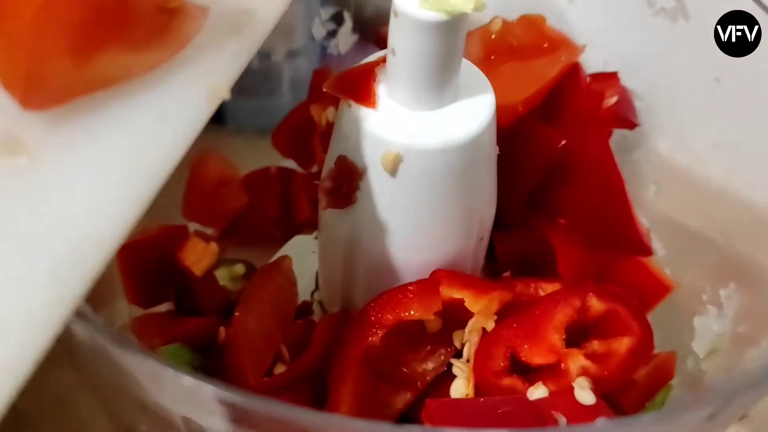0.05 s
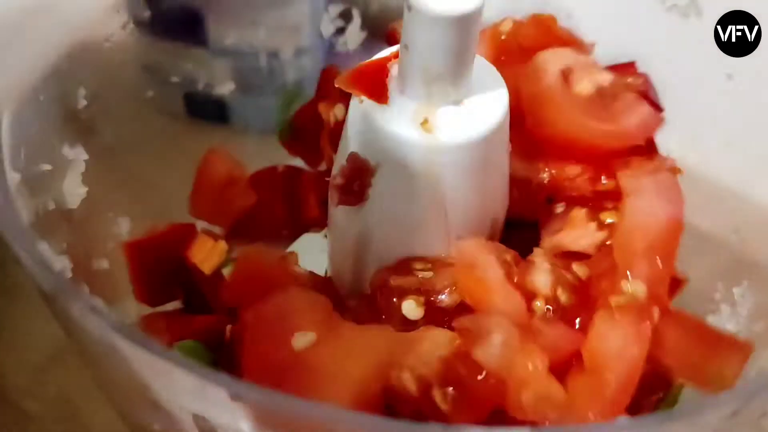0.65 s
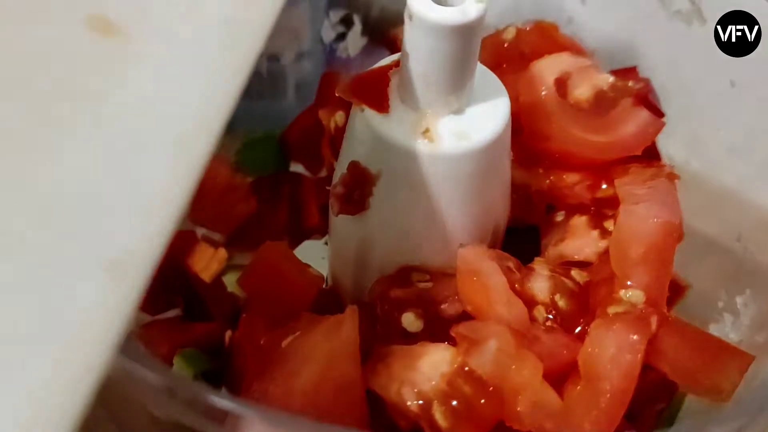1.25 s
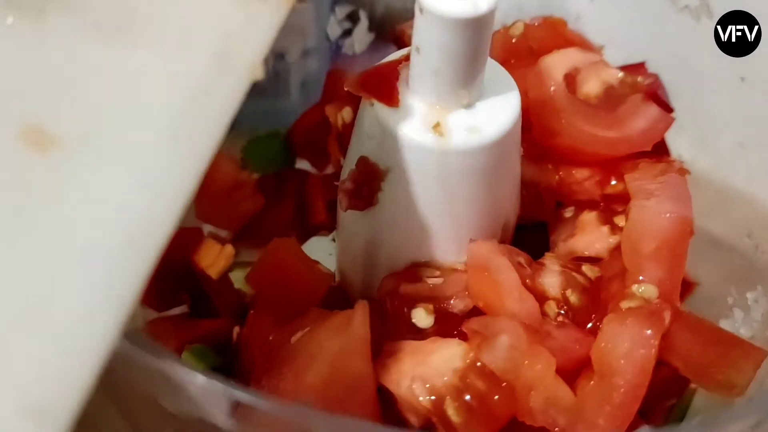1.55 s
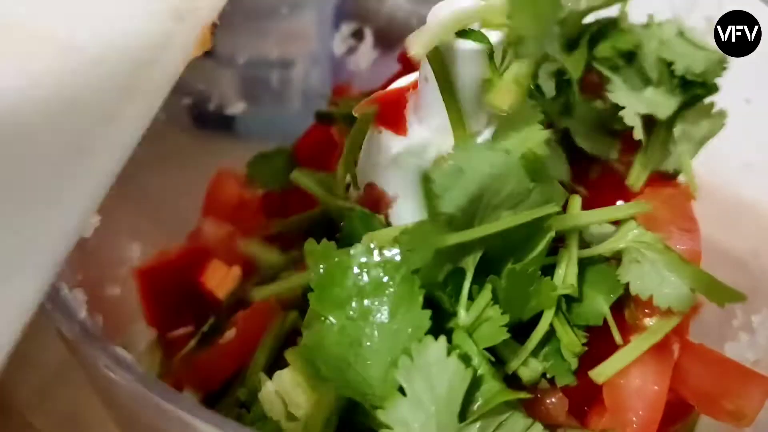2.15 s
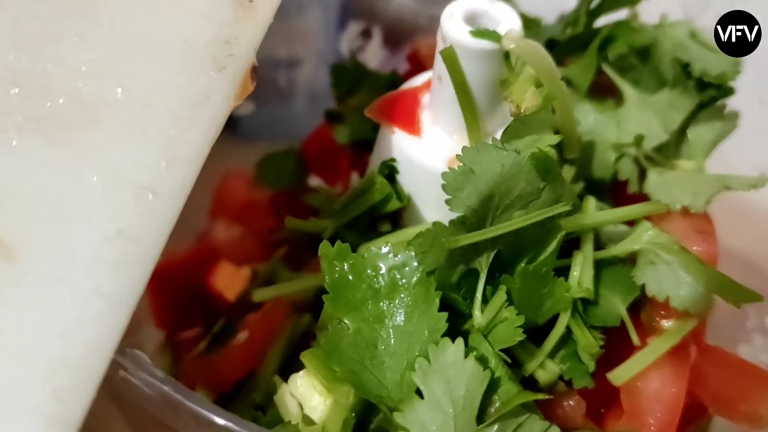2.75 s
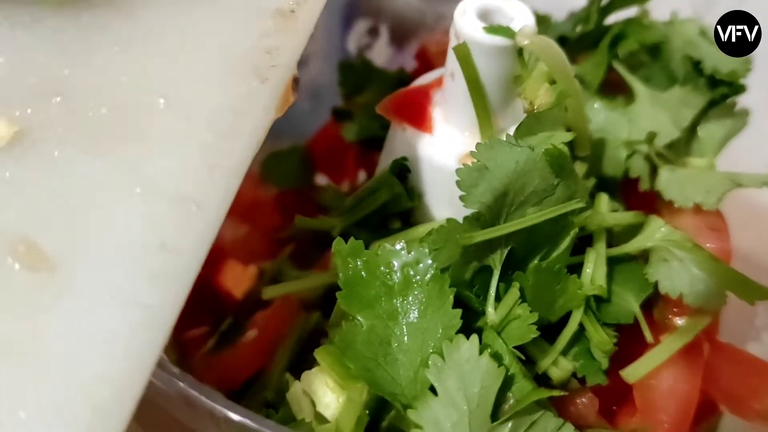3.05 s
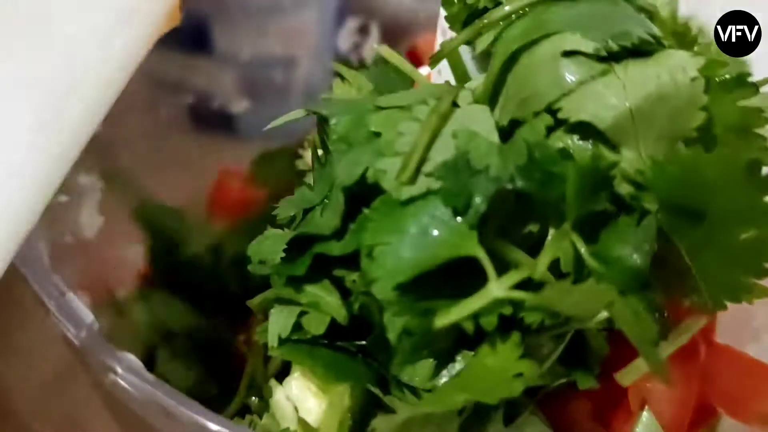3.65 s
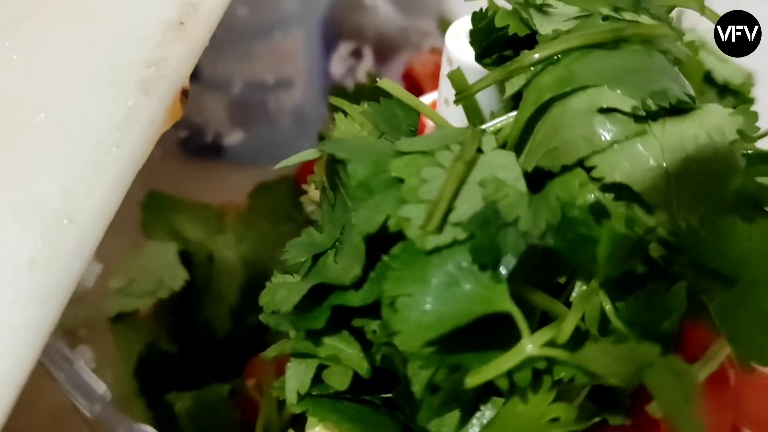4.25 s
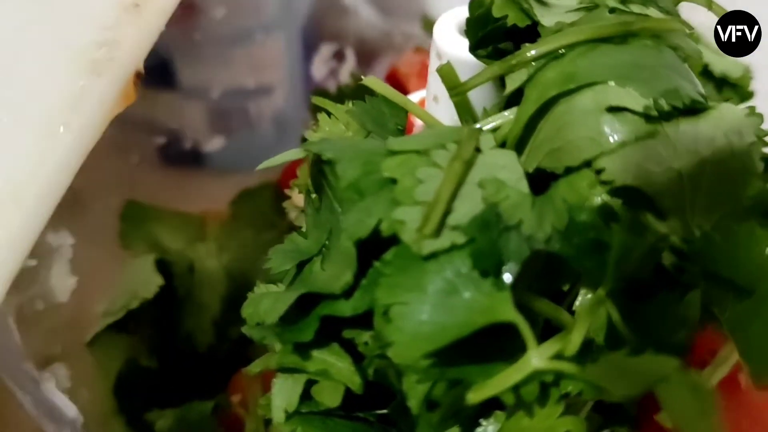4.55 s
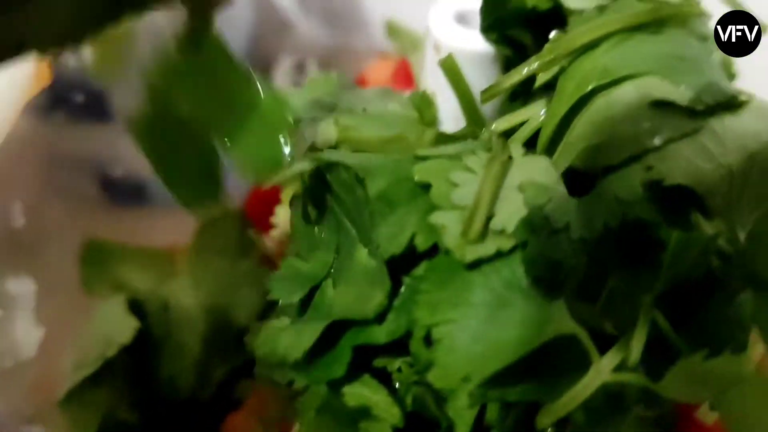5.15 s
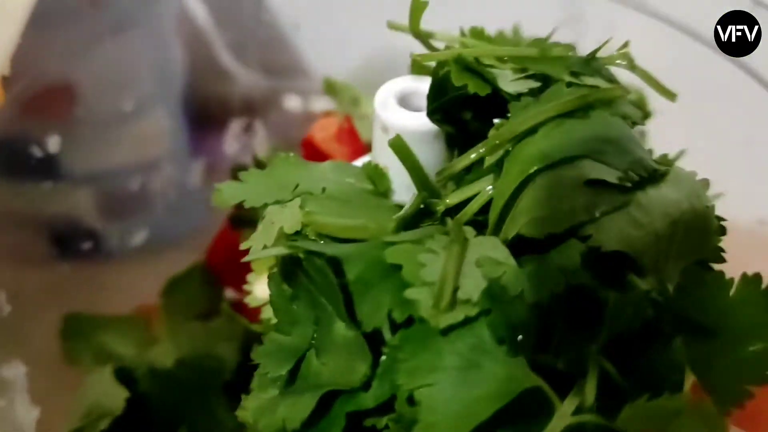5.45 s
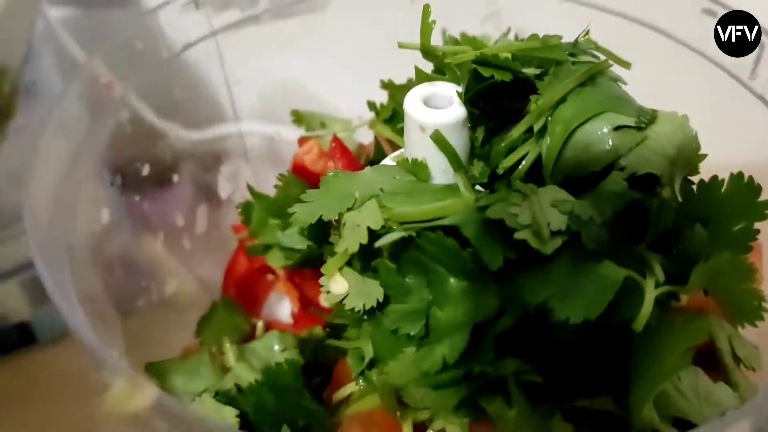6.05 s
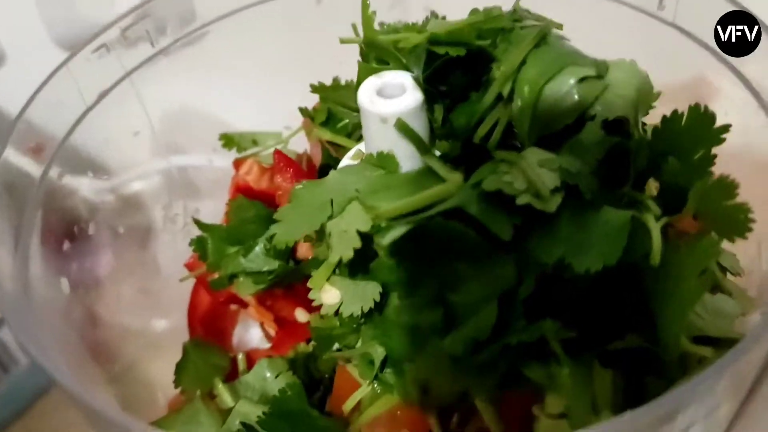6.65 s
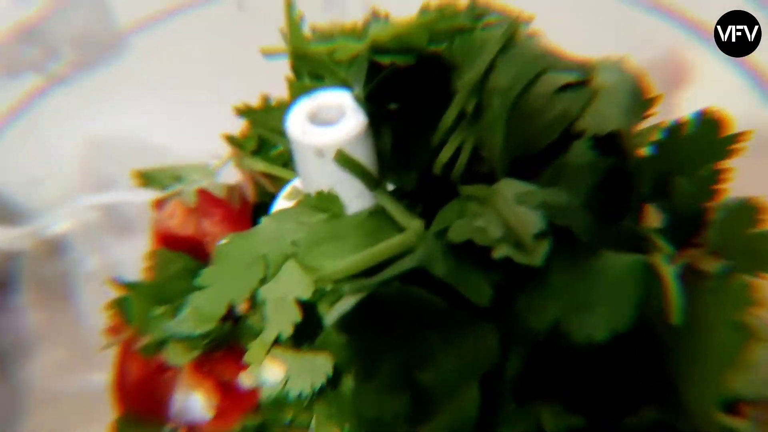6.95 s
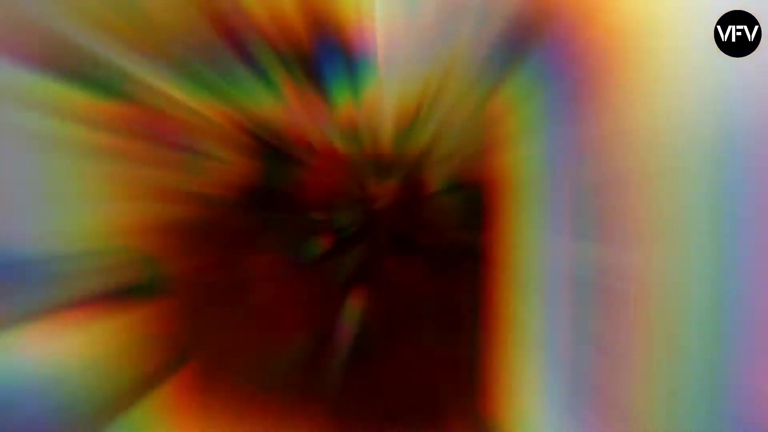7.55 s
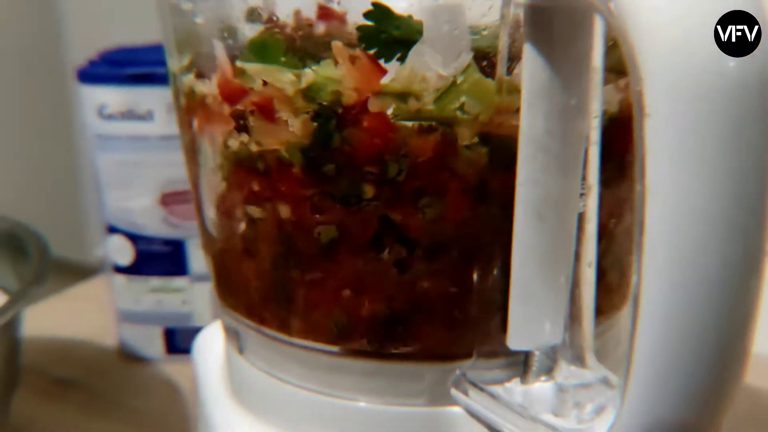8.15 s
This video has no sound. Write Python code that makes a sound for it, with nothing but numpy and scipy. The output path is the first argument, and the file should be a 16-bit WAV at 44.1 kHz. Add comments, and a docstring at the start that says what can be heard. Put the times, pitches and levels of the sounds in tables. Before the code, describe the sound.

Close to the microphone in a quiet kitchen, a knife briefly scrapes and taps a plastic cutting board. A sharp knock comes at about 0.9 seconds, then wet chopped vegetables slide, squelch and tumble softly into a plastic bowl until around 2 seconds. Another sharp knock at 2.4 seconds leads into two short scrapes, followed by leafy rustling, soft bumps and small wet ticks. From 3.7 to 5.4 seconds the knife makes louder, hissing, rasping strokes mixed with taps, and a quick run of knocks follows between 5.2 and 5.9 seconds. Around 6.5 seconds the plastic bowl gives a cluster of clicks and hollow clunks. After one more click at 7.1 seconds, a food chopper starts and swells, churning with a wet whirr as pieces slap and drum against the wall, still running at the end, about 8.3 seconds.

```python
"""A knife knocks and scrapes chopped vegetables off a plastic board into a food chopper, close by
in a kitchen. Wet pieces rustle and tumble, the plastic bowl clunks, then the chopper starts and churns.
The edge sticks and slips on the flexing board; blows ring the modes of board and bowl; the chopper's
blades fling pieces at the wall, which drums bowl and housing."""
import sys
import numpy as np
from scipy import signal
from scipy.fft import irfft
from scipy.io import wavfile
from scipy.ndimage import uniform_filter1d, map_coordinates

SR = 44100
rng = np.random.default_rng(int(sys.argv[2]) if len(sys.argv) > 2 else 0)


def wav_out(sig):
    """Save sig, one row per channel (or a flat mono array), as 16-bit PCM at SR to the path in sys.argv[1]."""
    wavfile.write(sys.argv[1], SR, np.round(np.clip(np.atleast_2d(sig).T, -1, 1) * 32767).astype(np.int16))


N = 365588
TIME = np.arange(N) / SR
RING_S = np.arange(SR * 2 // 3) / SR  # time axis of a decay
CHOPPER_START_S = 7.16
# board to the right, then the microphones turn to the bowl: t/s, left lag/ms, left minus right/dB
BEARING = [(0, 0.4, -4), (3.8, 0.39, -2), (5.3, 0.4, -1.5), (5.8, 0.4, -4), (6.2, 0.239, 0.5),
           (6.6, .2, 2.5), (8.3, .27, -0.5)]


def amp(db):
    """Decibels to gain."""
    return 10 ** (np.asarray(db) / 20)


def unit(x):
    """Scale to rms 1."""
    return x / np.sqrt(np.mean(x ** 2) + 1e-20)


def at_hz(points, hz):
    """Interpolate a table over log frequency."""
    f, value = np.transpose(points)
    return np.interp(np.log(hz + 1), np.log(f + 1), value)


def over_time(rows, column):
    """Interpolate one table column over time."""
    return np.interp(TIME, *np.transpose(rows)[[0, column]])


def add(mix, start_s, sound):
    """Mix in a sound at start_s."""
    part = mix[max(round(start_s * SR), 0):][:len(sound)]
    part += sound[:len(part)]


def colour(x, spectrum, size=2048):
    """Minimum-phase filter; spectrum: f/Hz, gain/dB."""
    log_gain = np.log(amp(at_hz(spectrum, abs(np.fft.fftfreq(size, 1 / SR)))))
    taps = np.fft.ifft(np.exp(np.conj(signal.hilbert(log_gain)))).real
    return signal.oaconvolve(x, taps)[:len(x)]


def resonate(x, hz, width_hz):
    """Unity-gain resonance following the curve hz."""
    carrier = np.exp(2j * np.pi * np.cumsum(hz) / SR)
    pole = np.exp(-np.pi * width_hz / SR)
    return 2 * (carrier * signal.lfilter([(1 - pole) ** 2], [1, -2 * pole, pole * pole], x / carrier)).real


def wander(step_s):
    """Random drift, rms 1."""
    knots_s = np.arange(0, TIME[-1] + 1, step_s)
    return unit(np.interp(TIME, knots_s, rng.standard_normal(1000)[:len(knots_s)]))


def envelope(pushes, attack_s, release_s, column=4):
    """Gain of a set of pushes: attack, swell, fade, release; column holds the level/dB."""
    gain = np.zeros(N)
    for push in pushes:
        start_s, swell_s, fade_s, depth_db = push[:4]
        top_s = start_s + swell_s
        end_s = top_s + fade_s
        pressure_db = np.interp(TIME, [start_s, top_s, end_s], [-depth_db, 0, -depth_db])
        edges = (np.maximum(start_s - TIME, 0) / attack_s) ** 2 + np.maximum(TIME - end_s, 0) / release_s
        gain = np.maximum(gain, amp(push[column] + pressure_db) * np.exp(-np.minimum(edges, 30)))
    return gain


def grains(per_s, spread_db, clump_db, clump_s):
    """Tiny slips and impacts, uneven in size, in clumps."""
    sizes = rng.standard_normal(N) * amp(spread_db * np.minimum(rng.exponential(1, N), 4))
    clumps = unit(uniform_filter1d(rng.standard_normal(N), int(clump_s * SR)))
    return unit(sizes * (rng.random(N) < per_s / SR) * amp(clump_db * clumps))


def pops(lo_hz, hi_hz, per_s, decay_cycles, spread_db):
    """Short wet pops, random in time, pitch and size."""
    when, pitch, size = rng.random((int(per_s * TIME[-1]), 3)).T[:, :, None]
    step = np.arange(SR // 50)
    cycles = lo_hz * (hi_hz / lo_hz) ** pitch * step / SR
    decay = np.exp(-cycles / decay_cycles) * (1 - step / len(step))
    sound = amp(-spread_db * np.log(size + .03)) * np.cos(2 * np.pi * cycles) * decay
    index = (when * N).astype(int) + step
    return unit(np.bincount(index.ravel(), sound.ravel(), N)[:N])


def room_tone(level_db=-58.5):
    """Room tone and microphone hiss, partly common to both sides."""
    spectrum = [(20, 5), (45, 1.5), (100, -7), (155, 8.5), (230, -7.5), (500, -9), (1000, -22),
                (4000, -21.5), (5800, -22.5), (7300, -10.5), (9000, -19), (10500, -38), (15500, -39)]  # noise floor: f/Hz, level/dB
    left, right, both = (colour(noise, spectrum) for noise in rng.standard_normal((3, N)))
    return amp(level_db) * unit(np.array([left, right]) + both)


def kitchen(first_s=.004, coherent_hz=450):
    """Dense reflections dying band by band; bass partly alike on both sides."""
    decay_times = [(100, 0.13), (500, 0.32), (2000, 0.29), (8000, 0.18), (15000, 0.016)]  # reverberation: f/Hz, t60/s
    shape = (2, len(RING_S))
    taps = rng.standard_normal(shape) * (rng.random(shape) < .12) * (RING_S > first_s)
    hz, t, bands = signal.stft(taps, SR, nperseg=256)
    coherence = .6 * np.exp(-(hz[:, None] / coherent_hz) ** 2 / 2)
    bands[1] = coherence * bands[0] + np.sqrt(1 - coherence ** 2) * bands[1]
    tail = signal.istft(bands * amp(-60 * t / at_hz(decay_times, hz)[:, None]), SR, nperseg=256)[1]
    return tail / np.linalg.norm(tail, axis=1, keepdims=True)


def near_reflections(t60_s=.013, cutoff_hz=750):
    """Early reflections off bowl, blade and board; long waves bend around them."""
    t = RING_S[:SR // 20]
    taps = rng.standard_normal((2, len(t))) * amp(-60 * t / t60_s)
    taps = signal.sosfilt(signal.butter(2, cutoff_hz, "high", fs=SR, output="sos"), taps)
    return taps / np.linalg.norm(taps, axis=1, keepdims=True)


def moving(x, response, fade_hz, count=3):
    """A moving source fades from one set of reflections into the next."""
    shares = [np.cos(np.pi * (fade_hz * TIME + k / count)) * np.sqrt(2 / count) for k in range(count)]
    return sum(signal.oaconvolve((x * share)[None], response(), axes=1)[:, :N] for share in shares)


def direct_path(x):
    """The straight path reaches the right microphone first."""
    lag_samples = over_time(BEARING, column=1) * SR / 1000
    return np.array([map_coordinates(x, [np.arange(N) - lag_samples], order=3), x])


def vegetables():
    """Wet leaves fizz and snap, stems crackle as they settle, juice ticks and squelches, pieces bump."""
    # pushes: start/s, swell/s, fade/s, depth/dB, level/dB
    slides = [(0.25, 0.021, 0.067, 3, -51), (0.67, 0.018, 0.14, 7, -64.5), (1.01, 0.07, 0.27, 1.5, -44),
              (1.35, 0.078, 0.16, 2.5, -39.5), (1.6, 0.065, 0.12, 2.5, -44), (1.8, 0.022, 0.066, 6, -52),
              (1.98, 0.012, 0.06, 14, -54.5), (2.14, 0.048, 0.078, 12, -49), (2.73, 0.36, 0.066, 0, -41.5),
              (3.09, 0.017, 0.042, 6, -48), (3.16, 0.018, 0.32, 13, -54), (3.59, 0.079, 0.095, 1, -58),
              (3.93, 0.1, 0.075, -6.5, -55), (4.54, 0.2, 0.21, 0, -53), (5.0, 0.2, 0.017, 7.5, -48.5),
              (5.45, 0.77, 0.11, 0, -53), (6.2, 0.11, 0.14, 3, -64), (6.52, 0.046, 0.59, 2, -50)]  # leaves and slices sliding or settling
    tumbles = [(0.0, 0.036, 0.057, -5.5, -42), (0.2, 0.039, 0.05, 4.5, -38),
               (1.05, 0.018, 0.019, 8.5, -33.5), (1.13, 0.058, 0.48, 2, -40),
               (1.36, 0.095, 0.34, 16.5, -32.5), (1.72, 0.027, 0.022, 7, -35.5),
               (1.99, 0.054, 0.022, 9, -51), (2.13, 0.063, 0.1, 9, -44), (2.74, 0.065, 0.1, 2.5, -46),
               (2.892, 0.018, 0.096, -0.5, -32.5), (3.03, 0.049, 0.403, 11, -50),
               (3.54, 0.048, 0.21, 1, -52), (5.04, 0.021, 0.035, 5, -48.5), (6.55, 0.063, 0.06, 20, -26),
               (6.72, 0.011, 0.083, 8, -42.5)]  # soft pieces rolling into the bowl
    # spectra: f/Hz, level/dB
    leaf_spectrum = [(500, -7), (850, -8), (1200, -12), (1700, -10), (3500, -8.5), (5500, -12), (7300, 0.5),
                     (9000, -3.5), (10300, -16), (12000, -16), (15500, -37)]
    bump_spectrum = [(50, -23), (110, -9), (170, 4), (270, 5.5), (430, -1), (750, -2.5), (1100, -12),
                     (1600, -14.5), (2500, -28), (4000, -47)]
    sliding = grains(per_s=7000, spread_db=-1.5, clump_db=0.9, clump_s=0.05)
    snaps = grains(per_s=90, spread_db=5, clump_db=7, clump_s=0.045)
    landings = grains(per_s=1100, spread_db=1.5, clump_db=2, clump_s=0.012)
    stems = grains(per_s=91, spread_db=1.5, clump_db=5.5, clump_s=0.075)
    fizz = amp(-4.5) * unit(colour(sliding + 0.1 * snaps, leaf_spectrum))
    bumps = amp(-2) * unit(colour(landings, bump_spectrum))
    crackle = amp(-32) * unit(colour(stems, leaf_spectrum))
    juice = amp(-6) * pops(lo_hz=6170, hi_hz=9470, per_s=260, decay_cycles=9.5, spread_db=2)
    squelch = amp(-15) * pops(lo_hz=786, hi_hz=5030, per_s=220, decay_cycles=4, spread_db=3.5)
    slide_gain = envelope(slides, attack_s=0.05, release_s=0.0059)
    tumble_gain = envelope(tumbles, attack_s=0.017, release_s=0.015)
    return (fizz + juice + squelch) * slide_gain + crackle * slide_gain ** 0.52 + bumps * tumble_gain


def contact(spectrum, t60_s, seat_s=0.000791):
    """A smeared jolt as the edge seats, then brief chatter; rms 1 over the first 4 ms."""
    t = RING_S[:SR // 10]
    hz = np.fft.rfftfreq(len(t), 1 / SR)
    delay_s = seat_s + .0016 * np.interp(hz, np.linspace(0, SR / 2, 48), rng.random(48))
    jolt = irfft(np.exp(-2j * np.pi * np.cumsum(delay_s) * hz[1]), len(t))
    chatter = rng.standard_normal(len(t)) * amp(-23 - 60 * t / t60_s) * (t > seat_s)
    sound = colour(jolt + chatter, spectrum)
    return sound / np.sqrt(np.mean(sound[:SR // 250] ** 2))


def blows(hits, modes, tick_trim_db, clack_trim_db, thud_trim_db, rise_s, scatter, spot_db, spot_t60_s):
    """Blows on plastic: bright tick, crack, duller clack, and a thud of struck spot and body modes."""
    # spectra: f/Hz, level/dB
    tick_spectrum = [(1500, -27.5), (3600, -17), (5200, -6), (7300, 4.5), (9000, 0), (10500, -16.5),
                     (15500, -23)]
    crack_spectrum = [(800, -14.5), (2200, 1), (3300, 1), (4600, 2.5), (6000, -5.5), (9000, -21),
                      (15500, -37)]  # a hard, square hit
    clack_shape = [(0.08, -27.5), (0.25, -1), (0.45, -0.5), (0.72, -4), (1, 7), (1.3, -7.5), (1.8, -5),
                   (4.5, -41.5)]  # spectrum: multiple of the clack pitch, level/dB
    out = np.zeros(N)
    mode_hz, mode_db, mode_t60_s = np.transpose(modes)[:, :, None]
    for start_s, tick_db, crack_db, thud_db, clack_db, contact_t60_s, spot_hz, clack_hz in hits:
        clack_spectrum = [(multiple * clack_hz, db) for multiple, db in clack_shape]
        tick = amp(tick_db + tick_trim_db) * contact(tick_spectrum, contact_t60_s)
        crack = amp(crack_db) * contact(crack_spectrum, contact_t60_s)
        clack = amp(clack_db + clack_trim_db) * contact(clack_spectrum, contact_t60_s)
        add(out, start_s, tick + crack + clack)
        # the place of the blow changes each mode's share and pitch
        share, detune, side = rng.standard_normal((3, len(modes), 1))
        decays = np.sign(side) * amp(mode_db + 2 * share - 60 * RING_S / mode_t60_s)
        ring = (decays * np.sin(2 * np.pi * mode_hz * (1 + scatter * detune) * RING_S)).sum(0)
        ring += amp(spot_db - 60 * RING_S / spot_t60_s) * np.sin(2 * np.pi * spot_hz * RING_S)
        ring *= 1 - np.exp(-RING_S / rise_s)
        onset_rms = np.sqrt(np.mean(ring[:SR // 100] ** 2))
        add(out, start_s, amp(thud_db + thud_trim_db) * ring / onset_rms)
    return out


def bowl_clunks():
    """Plastic parts of the bowl click home and ring it."""
    # hits: t/s, tick/dB, crack/dB, thud/dB, clack/dB, contact t60/s, spot/Hz, clack/Hz
    clunks = [(6.4778, -33.5, -58, -72, -67, 0.02, 601, 1500),
              (6.503, -18, -40, -37, -46, 0.033, 590, 1210),
              (6.538, -56, -59, -29.5, -37.5, 0.057, 1140, 1210),
              (6.5837, -22, -30, -20, -26.5, 0.025, 418, 1480), (6.599, -42, -53, -30, -32, .04, 260, 1670),
              (6.616, -47, -59, -21.5, -44, .02, 397, 600),
              (6.6323, -18.5, -38, -29, -36, 0.026, 308, 1100), (6.648, -50, -60, -25, -46, .015, 161, 600),
              (6.716, -42, -46, -35, -39, 0.014, 557, 1300),
              (7.1436, -21.5, -52, -44, -36.5, 0.04, 570, 1490)]
    bowl_modes = [(91.5, -13, 0.27), (163.1, -0.5, 0.6), (238, -8, 0.084), (356, -11, 0.073),
                  (425, -3, 0.078), (545, 8.5, 0.081), (607, 4, 0.1), (830, 4, 0.064), (1140, -2, 0.09),
                  (1300, -9, 0.035), (1476, -3, 0.038), (1810, 0, 0.045)]  # f/Hz, level/dB, t60/s
    return blows(clunks, bowl_modes, tick_trim_db=-8.5, clack_trim_db=4, thud_trim_db=-8.5,
                 rise_s=0.0017, scatter=0.017, spot_db=13.5, spot_t60_s=0.063)


def lumps(relative_width=0.11):
    """Big pieces dragged round the wall make the bowl boom, each at its own pitch."""
    drags = [(7.53, .03, 0.061, 3, -35.5, 300), (7.54, .015, .03, 5, -30, 1900),
             (7.815, .055, .04, 7, -29, 257), (7.835, 0.016, 0.015, -0.5, -28, 707),
             (7.85, .015, .025, 3, -28, 1910), (7.91, 0.016, 0.026, 27, -27, 740),
             (7.955, 0.036, 0.033, 8, -22.5, 2860), (7.97, 0.019, 0.017, 11, -36, 302),
             (8.07, 0.03, 0.027, 4, -25.5, 700), (8.075, 0.032, 0.049, 11, -33, 173),
             (8.1, 0.019, 0.014, 5, -23, 1955), (8.122, 0.015, .018, 2, -24, 836),
             (8.25, .015, .025, -0.5, -24.5, 1060)]  # start/s, swell/s, fade/s, depth/dB, level/dB, f/Hz
    out = np.zeros(N)
    rubbing = grains(per_s=4200, spread_db=0, clump_db=-1, clump_s=0.0079)
    running = TIME >= CHOPPER_START_S
    for drag in drags:
        hz = drag[-1]
        boom = unit(resonate(rubbing[running], np.full(running.sum(), hz), relative_width * hz))
        out[running] += boom * envelope([drag], attack_s=0.011, release_s=0.014)[running]
    return amp(-3) * out


def chopper_load(rise_db, spin_up_s=0.014, draw_in_s=0.8, ease_db_per_s=8.5, surge_db=0.36):
    """Chopper gain: quick start, climb to full load, slow easing, random surges."""
    t = TIME - CHOPPER_START_S
    switch_on = (1 + np.tanh(t / spin_up_s)) / 2
    load_db = rise_db * np.clip(t / draw_in_s - 1, -1, 0) - ease_db_per_s * np.maximum(t - draw_in_s, 0)
    return switch_on * amp(load_db + surge_db * wander(step_s=0.046))


def housing_ring(shaking):
    """Shaking rings the resonances of housing and bowl."""
    modes = [(164.5, 11, -5), (262, 36, 4.5), (440, 34, -14), (512, 10, -11), (734, 31, 6), (833, 42, 4),
             (1030, 12, -15.5), (1130, 14, 5), (1440, 54, 9), (1866, 22, 4), (1896, 91, 11), (2350, 22, -6),
             (2780, 63, 1), (2925, 38, 5)]  # f/Hz, width/Hz, level/dB
    response = sum(amp(db) * np.sqrt(width_hz) * np.exp(-np.pi * width_hz * RING_S)
                   * np.cos(2 * np.pi * hz * RING_S) for hz, width_hz, db in modes)
    response = signal.sosfilt(signal.butter(4, 130, "high", fs=SR, output="sos"), response)
    return unit(signal.oaconvolve(shaking, response)[:N])


def chopper():
    """Blades fling pieces at the wall: patter drumming on the bowl, slaps, thumps, whirr and wet spray."""
    # spectra: f/Hz, level/dB
    churn_spectrum = [(500, -27), (1000, -9), (1450, 0), (2000, 0.5), (3100, 3.5), (3700, -8.5),
                      (5000, -14), (9000, -34)]
    spray_spectrum = [(2500, -16.5), (4000, -11), (5500, -9), (7300, 0), (8900, -7.5), (10300, -15.5),
                      (12000, -22), (15500, -29)]
    drum_spectrum = [(40, -34), (110, -18), (200, -9), (400, -7), (720, 5), (1000, 6.5), (1300, -6),
                     (2500, -38.5)]
    whirr_centre = [(7.16, 1970), (7.274, 2520), (7.846, 2450), (7.898, 2220), (7.986, 2690), (8.126, 1930),
                    (8.222, 2360), (8.28, 2100)]  # swirling pieces: t/s, f/Hz
    heap_drop = [(7.945, 0.052, 0.3, 5, -24.5)]  # heap falls into the blades: start/s, swell/s, fade/s, depth/dB, level/dB
    patter = grains(per_s=6000, spread_db=3.5, clump_db=2.9, clump_s=0.0035)
    chunks = grains(per_s=1800, spread_db=3.5, clump_db=1.2, clump_s=0.0054)
    shaking = grains(per_s=3000, spread_db=1.5, clump_db=1.5, clump_s=0.011)
    whirr = unit(resonate(chunks, over_time(whirr_centre, column=1), width_hz=350))
    slaps = pops(lo_hz=1340, hi_hz=3420, per_s=220, decay_cycles=13, spread_db=4)
    churn = amp(-2) * unit(colour(patter, churn_spectrum)) + amp(-7) * whirr + amp(-5) * slaps
    droplets = grains(per_s=13000, spread_db=1, clump_db=0.5, clump_s=0.0069)
    spray = unit(colour(droplets, spray_spectrum))
    thumps = pops(lo_hz=223, hi_hz=1245, per_s=150, decay_cycles=7.2, spread_db=2.5)
    drum = amp(-4.5) * unit(colour(chunks, drum_spectrum))
    drum += amp(-8) * housing_ring(shaking) + amp(-7) * thumps
    drop_gain = envelope(heap_drop, attack_s=.012, release_s=.03)
    return (churn * np.maximum(amp(-25) * chopper_load(rise_db=11.5), drop_gain)
            + amp(-24.5) * spray * chopper_load(rise_db=11)
            + amp(-24) * drum * chopper_load(rise_db=13.5))


def knife_scrapes(attack_s=0.0104, release_s=0.013, grip_db=3, judder_db=1.02):
    """The edge sticks and slips on scored plastic in step with the flexing board, whose
    resonances shift with the blade's place; each slip puffs hiss."""
    # start/s, swell/s, fade/s, depth/dB, hiss/dB, rasp/dB, rumble/dB,
    # board first/Hz, board last/Hz, chatter re rasp/dB, edge hiss/Hz
    strokes = [(0.0, 0.03, 0.065, 5, -39, -41, -38.5, 260, 273.6, -7.5, 7800),
               (0.116, 0.027, 0.025, 3, -40.5, -50, -46, 307, 331.4, -10, 7950),
               (0.194, 0.017, 0.014, 4, -34.5, -41, -27.5, 646, 639, -2, 7670),
               (0.966, 0.017, 0.0065, 5, -28, -32, -31, 454, 399.4, -5, 8160),
               (2.379, 0.049, 0.082, 6.5, -36, -38.5, -34, 790, 675, -1, 7300),
               (2.526, 0.065, 0.1, 7.5, -31.5, -34, -31.5, 491, 304.4, -0.5, 8500),
               (3.76, 0.008, 0.039, 4, -26, -36, -35.5, 415.2, 400.4, 0, 8200),
               (3.815, 0.032, 0.039, 7, -23.5, -35, -33.5, 395.4, 383.5, 3.5, 8060),
               (4.283, 0.07, 0.08, 4.5, -22.5, -31, -34, 349.4, 386, -0.5, 7300),
               (4.385, 0.059, 0.022, 4, -20, -26.5, -26.5, 338, 399.5, -1.5, 8050),
               (4.812, 0.057, 0.053, 11.5, -17.5, -24.5, -28.5, 289.4, 218.4, -4.5, 8100),
               (5.242, 0.066, 0.075, 9, -27, -32.5, -32, 316.5, 313.6, 0.5, 6700)]
    # spectra: f/Hz, level/dB
    hiss_spectrum = [(2000, -44.5), (3800, -4.5), (5200, -10.5), (6300, 1.5), (7300, 3), (8100, -6.5),
                     (8900, 4), (10200, -14), (12000, -13.5), (15500, -31.5)]
    rasp_spectrum = [(400, -79), (900, -6), (1500, 1.5), (2000, 1), (2800, -1), (3600, -1.5), (5500, -6.5),
                     (9000, -29)]
    chatter_spectrum = [(200, -12.5), (400, -4.5), (780, 3), (1150, -6), (1550, 4.5), (2300, -1.5),
                        (3500, -11.5), (6000, -19), (12000, -40)]  # one slip of the blade
    rumble_spectrum = [(50, -34), (110, -28), (190, -12.5), (300, 1.5), (450, 3), (800, 4.5), (1050, 2.5),
                       (1600, -34)]
    hiss_gain, rasp_gain, rumble_gain = (envelope(strokes, attack_s, release_s, col) for col in (4, 5, 6))
    board_hz, chatter_db, edge_hz = np.zeros((3, N))
    for start_s, swell_s, fade_s, *_, first_hz, last_hz, stroke_chatter_db, stroke_edge_hz in strokes:
        touched = TIME >= start_s - attack_s
        end_s = start_s + swell_s + fade_s
        board_hz[touched] = np.interp(TIME[touched], [start_s, end_s], [first_hz, last_hz])
        chatter_db[touched], edge_hz[touched] = stroke_chatter_db, stroke_edge_hz
    slips = grains(per_s=4200, spread_db=1, clump_db=2, clump_s=0.0039)
    fine_slips = grains(per_s=12000, spread_db=2, clump_db=2.5, clump_s=0.00091)
    jitter = unit(uniform_filter1d(rng.standard_normal(N), SR // 300))
    cycles = np.cumsum(board_hz * (1 + .045 * jitter)) / SR
    # one catch per board cycle
    catches = np.diff(np.floor(cycles), prepend=0) * amp(2.5 * rng.standard_normal(N)) / np.sqrt(board_hz)
    grip = amp(grip_db * np.cos(2 * np.pi * cycles))
    hiss = amp(-1) * unit(colour((fine_slips + 0.27 * slips) * grip, hiss_spectrum))
    hiss += amp(-6) * unit(resonate(slips * grip, edge_hz, width_hz=1500))
    rasp = unit(colour(slips * grip, rasp_spectrum))
    rasp += amp(chatter_db) * unit(colour(catches, chatter_spectrum))
    board = unit(resonate(fine_slips, board_hz, width_hz=75))
    board += amp(-6.5) * unit(resonate(fine_slips, 1.9 * board_hz, width_hz=110))
    rumble = amp(-5) * unit(colour(slips, rumble_spectrum)) + amp(-3) * board
    judder = amp(judder_db * wander(step_s=0.011))
    return (hiss * hiss_gain + rasp * rasp_gain + rumble * rumble_gain) * judder


def blade_ring(hits, re_tick_db=-34, hz=2280, t60_s=0.15):
    """The steel blade rings on in proportion to each tick."""
    out = np.zeros(N)
    for start_s, tick_db, *_ in hits:
        decay = amp(tick_db + re_tick_db - 60 * RING_S / t60_s)
        add(out, start_s, decay * np.sin(2 * np.pi * hz * RING_S))
    return out


def board_knocks(bit_t60_s=0.039, bit_spot_hz=480, bit_clack_hz=1910):
    """Blade and pieces strike the board; small wet bits land with little more than a tick."""
    # hits: t/s, tick/dB, crack/dB, thud/dB, clack/dB, contact t60/s, spot/Hz, clack/Hz
    knocks = [(0.1935, -26, -44, -32, -37.5, .02, 640, 1300),
              (0.2073, -20, -40, -30, -45, 0.025, 665, 1300),
              (0.921, -13, -18, -25.5, -20.5, 0.019, 418, 2110),
              (1.0528, -46, -61, -30.5, -33, 0.037, 207, 1380),
              (1.493, -43, -55, -33, -40, .012, 294, 1100), (1.523, -40, -59, -34.5, -44, .012, 327, 1300),
              (1.571, -43, -61, -41, -43, .02, 272, 1600), (1.612, -45, -57, -45, -48, .012, 420, 1600),
              (1.737, -42, -58, -43, -50, .025, 310, 1490), (1.9758, -43, -51, -38.5, -43, 0.043, 176, 700),
              (2.036, -50, -60, -47.5, -51, .02, 258, 701),
              (2.3606, -9.5, -43, -28.5, -21, 0.009, 723, 2036),
              (2.8903, -52, -60, -33.5, -48, 0.015, 291.6, 750),
              (2.927, -50, -60, -33, -43, .015, 208.8, 896.5),
              (3.698, -40, -58, -37, -42, 0.0073, 427.4, 800),
              (4.2248, -29.5, -42, -30, -29, 0.012, 508, 896),
              (4.231, -55, -65, -34.5, -47, 0.0098, 169.5, 597.3),
              (4.4666, -8, -39, -27.5, -29, 0.029, 170.3, 1491),
              (4.7976, -33, -47, -26.5, -35, .006, 328.4, 595.3),
              (5.233, -8, -40, -22, -25.5, 0.0074, 520, 2136),
              (5.3502, -29, -43, -24, -27.5, 0.013, 427, 2170),
              (5.3569, -13, -33, -23, -26.5, 0.03, 467, 2162),
              (5.4278, -30.5, -43, -28.5, -34, 0.014, 419, 1000),
              (5.5601, -29, -43, -29, -31, 0.039, 516, 980), (5.577, -46, -51, -35, -31, .015, 264, 800),
              (5.6312, -15.5, -29, -29, -28, 0.04, 692, 2180), (5.83, -55, -67, -44, -60, .01, 249, 600),
              (5.8359, -28, -23.5, -24.5, -18, 0.0099, 417, 1060),
              (5.845, -42.5, -45, -33, -38, .02, 211, 704),
              (5.8838, -13.5, -40, -63, -55, 0.034, 500, 2100)]
    bits = [(0.3328, -39), (0.376, -34), (0.668, -42.5), (1.862, -37), (2.054, -42), (2.117, -53),
            (3.02, -30), (3.075, -35), (3.4128, -34), (3.643, -33), (4.076, -47), (4.7471, -47),
            (5.097, -33), (5.704, -33.5), (6.1384, -34), (6.772, -37), (7.02, -30)]  # landings: t/s, tick/dB
    board_modes = [(79, -21, 0.13), (162.5, -10, 0.072), (255, 0.5, 0.043), (329, -8, 0.03),
                   (409, 2, 0.047), (473, -5.5, 0.042), (565, 0, 0.059), (720, 5, 0.039), (870, 10, 0.021),
                   (1118, 0.5, 0.018)]  # f/Hz, level/dB, t60/s
    bit_hits = [(start_s, db, db - 23.5, db - 31, db - 27, bit_t60_s, bit_spot_hz, bit_clack_hz)
                for start_s, db in bits]
    board = blows(knocks + bit_hits, board_modes, tick_trim_db=-9, clack_trim_db=2, thud_trim_db=-1,
                  rise_s=0.0044, scatter=0.082, spot_db=6.5, spot_t60_s=0.049)
    return board + blade_ring(knocks)


def scene():
    """Close work at the board, then the chopper filling the room."""
    rubbing = knife_scrapes() + vegetables()
    knocks = board_knocks()
    bowl = bowl_clunks()
    machine = chopper() + lumps()
    struck = knocks + bowl
    sustained = rubbing + amp(-3) * machine
    room_send = amp(-12) * (rubbing + knocks) + amp(-7) * bowl + amp(-2) * machine
    early = moving(amp(-9) * struck + amp(-4) * sustained, near_reflections, fade_hz=3.7)
    late = moving(room_send, kitchen, fade_hz=3)
    balance = amp(np.outer([1, -1], over_time(BEARING, column=2)) / 2)
    return (direct_path(struck + sustained) + early + late) * balance + room_tone()


def record(dry, ceiling=.85, cutoff_hz=15600):
    """Microphone port colour, soft overload, band limit."""
    port_balance = [(200, 1), (500, 1), (2000, 1), (4200, -0.5), (6400, -2), (7300, -5), (8200, 2.5),
                    (9000, 18), (10000, 1), (12000, 3.5)]  # the two ports ring at different pitches: f/Hz, left minus right/dB
    ports = np.array([colour(x, [(hz, side * db / 2) for hz, db in port_balance])
                      for x, side in zip(dry, (1, -1))])
    clipped = np.tanh(ports / ceiling) * ceiling
    lowpass = signal.firwin(511, cutoff_hz, window=("kaiser", 9), fs=SR)
    return signal.oaconvolve(clipped, lowpass[None], "same")


dry = scene()
out = record(dry)
wav_out(out)
```